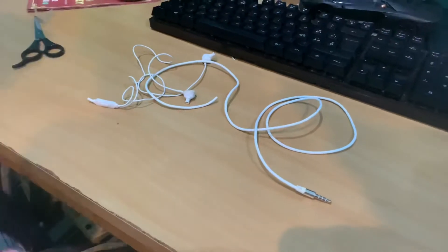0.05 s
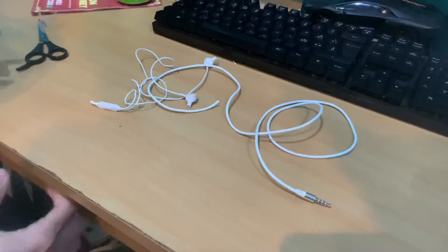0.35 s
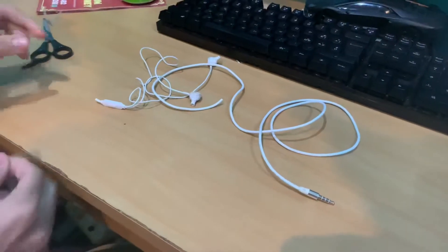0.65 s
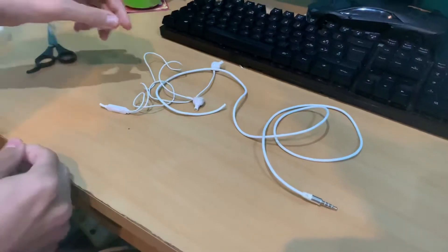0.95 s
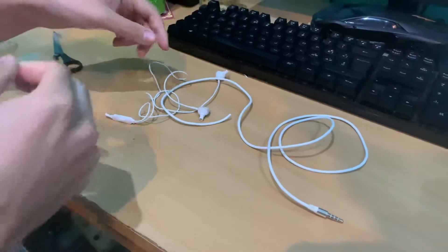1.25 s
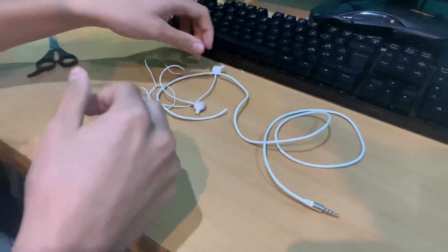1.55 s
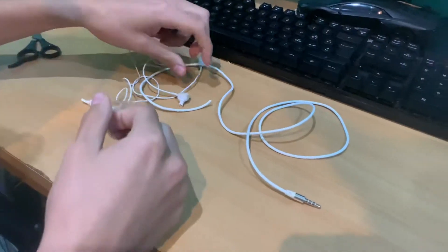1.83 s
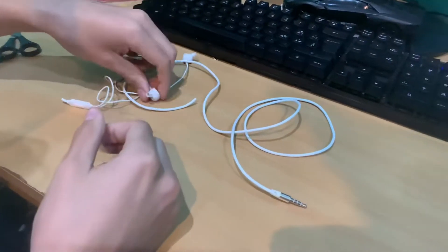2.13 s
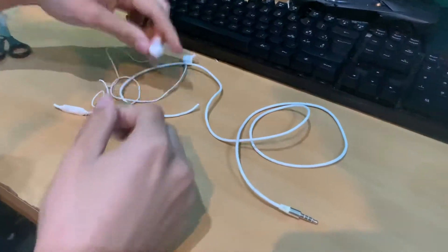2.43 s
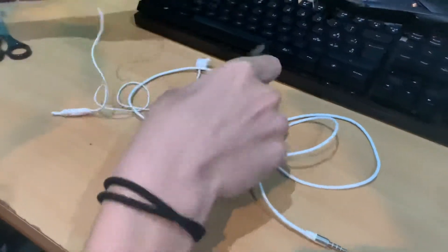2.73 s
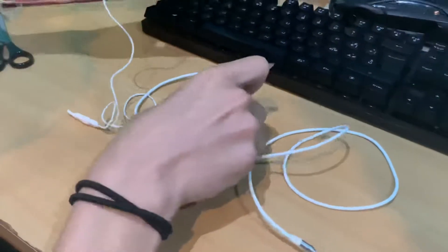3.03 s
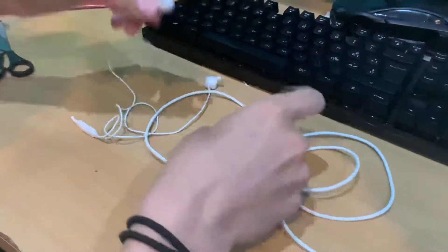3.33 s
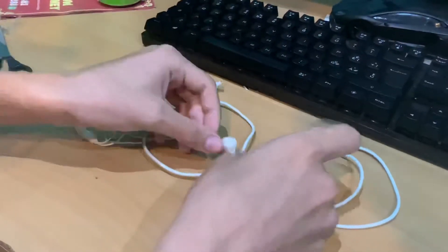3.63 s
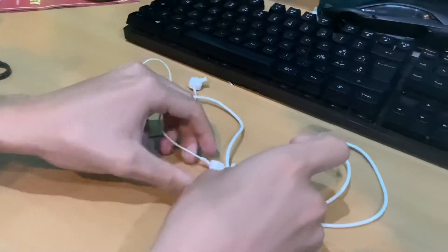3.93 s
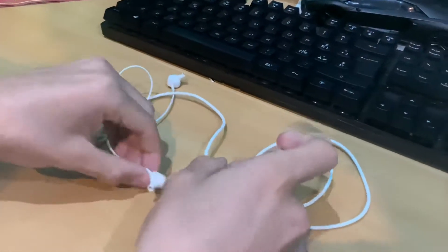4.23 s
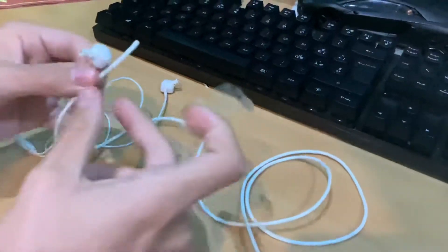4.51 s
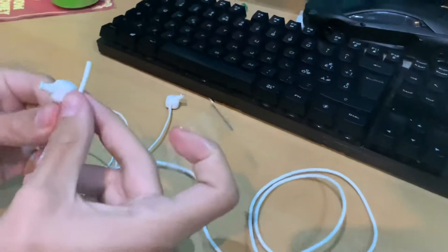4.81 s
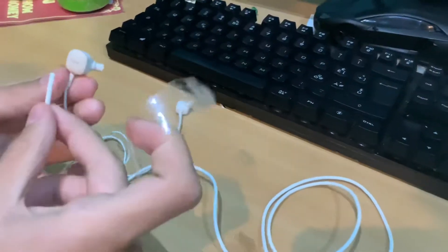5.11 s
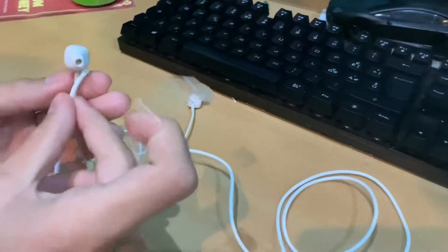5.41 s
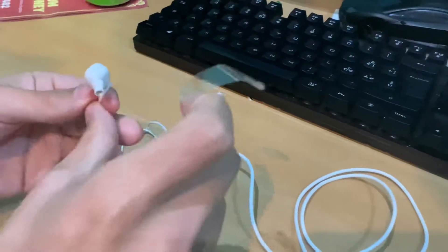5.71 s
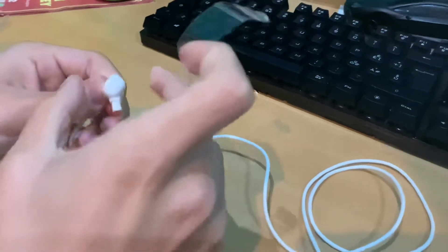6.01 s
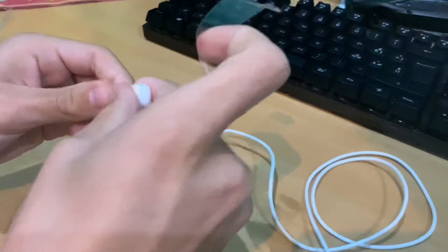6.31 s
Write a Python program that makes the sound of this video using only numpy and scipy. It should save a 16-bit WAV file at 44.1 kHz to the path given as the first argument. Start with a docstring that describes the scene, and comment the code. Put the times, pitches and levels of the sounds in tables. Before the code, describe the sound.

Wired earphones are handled on a wooden desk in a quiet room, close to the microphone. A soft brush of a hand leads into bright plastic clicks, then scattered light knocks with muffled handling bumps. The cable slides with a soft hiss, an earbud clacks down, and two firmer knocks follow. Only tiny touches remain at the end, over low room noise and a faint regular electrical tick.

```python
"""A soft brush of skin on wood, then sharp plastic clicks: hands sort out wired earphones on a desk.
Fingers, cable and earbuds knock, each impact exciting damped modes of the plastic or the desk top.
Skin, plastic and the rubber cable slide with the hiss and rasp of stick-slip friction.
Beneath lie soft thumps of handling, the noise of a quiet room and a faint regular electrical tick.
A small two-port microphone close by picks it all up."""
import sys
import numpy as np
from scipy import signal
from scipy.fft import rfft, irfft, next_fast_len
from scipy.io import wavfile

SR = 44100
rng = np.random.default_rng(int(sys.argv[2]) if len(sys.argv) > 2 else 0)


def store_wav(level_fs):
    """Save 16-bit WAV to argv[1]."""
    pcm = np.round(np.clip(np.atleast_2d(level_fs), -1, 1) * 32767)
    wavfile.write(sys.argv[1], SR, pcm.T.astype(np.int16))


N = 280476
TIME = np.arange(N) / SR

# reverberation time of the room: f/Hz, t60/s
ROOM_DECAY = [(200, 0.2), (530, 0.25), (1400, 0.32), (3700, 0.3), (10000, 0.16)]
# coherence of the two ports: f/Hz, coherence (0-1)
PORT_COHERENCE = [(300, 1), (750, .99), (1100, .8), (1500, .2), (2100, .35), (2500, .9), (2950, .9),
                  (3300, .7), (4800, .7), (5900, .25), (6600, .97), (7400, .97), (8400, .75), (9350, .995),
                  (10100, .995), (11200, .75), (12400, .98), (14000, .6)]
# phase by which the left port leads: f/Hz, phase/rad
PORT_LEAD = [(0, 0), (1100, 0), (1900, 3.1), (3000, 3.1), (4000, 1.8), (4800, 2.9), (5500, 2.9),
             (6400, 6.2), (7400, 6.4), (9350, 9.3), (10100, 9.6), (11900, 12.5), (12900, 12.7), (14500, 15)]

# spectral envelopes of the sources: f/Hz, level/dB
ROOM_SPECTRUM = [(20, -22.5), (50, 3), (130, -9.5), (250, -14), (420, -23), (540, -18), (700, -22.5),
                 (950, -25.5), (1150, -24), (1420, -15), (1560, -30), (2600, -32.5), (5000, -36.5),
                 (7000, -36), (12800, -37.5), (15000, -50.5)]
TICK_SPECTRUM = [(3000, -36), (5500, -12), (7000, 4.5), (8500, -10.5), (12500, -4.5), (15000, -12.5)]
SKIN_SPECTRUM = [(150, -2.5), (300, -4.5), (600, -1.5), (1100, 4), (2000, -5.5), (2800, -7), (4200, -17.5),
                 (5600, -19.5), (7200, -23.5), (9500, -25), (12500, -32.5), (15000, -40.5)]
CABLE_SPECTRUM = [(300, -23.5), (700, 2), (2000, 12), (2700, 11.5), (4100, 8.5), (5500, 4.5), (7500, -6.5),
                  (12000, 3.5), (15000, -46)]
DESK_SPECTRUM = [(120, -1.5), (200, -8.5), (380, -3.5), (550, -14), (950, 2), (1400, -7), (2000, -9),
                 (3000, -11), (3800, -19), (5500, -19), (8000, -22.5), (12000, -21.5), (13500, -33.5),
                 (15500, -36)]
EARBUD_SPECTRUM = [(150, -25), (470, -3.5), (750, -11.5), (1400, -4.5), (2000, -7), (2700, -3.5),
                   (3700, -10), (5000, -16.5), (7000, -33), (9500, -26), (12500, -30.5), (15500, -62)]
PLASTIC_SPECTRUM = [(150, -30.5), (500, -3.5), (750, -6.5), (1100, -3), (1600, -1), (2100, -5),
                    (2700, -22.5), (3600, -10.5), (5000, -6.5), (7000, -8), (9500, 2), (12000, -2.5),
                    (13600, -8), (14600, -21), (15500, -16)]
# further shaping of the plastic's spectrum when it is scraped: f/Hz, gain/dB
SCRAPE_SHAPING = [(150, -2), (2000, -3.5), (7000, 0), (12000, -2)]
# normal modes of each body: f/Hz, bandwidth/Hz, boost/dB
DESK_RESONANCES = [(186, 19, 9), (219, 16, 10), (307.4, 39, 6), (480.3, 39, 10), (544.3, 58, 7.5),
                   (720.3, 14, 6), (773, 18, 5.5), (927, 14, 1.5), (970, 37, 9.5), (1103.4, 53, 7.5),
                   (1376, 60, 6.5), (1599, 14, 6.5), (1716, 48, 9.5), (1890, 29, 11), (2040, 20, 7.5),
                   (2303, 14, 8)]
EARBUD_RESONANCES = [(455.5, 22, 8.3), (576, 25.4, 8.8), (737, 9.5, 16.8), (942, 35, 10), (1065, 61, 11),
                     (1280, 41.5, 8.3), (1550, 37, 6.4), (1750, 56, 8.3), (1983, 150, 8.2), (2205, 19, 12),
                     (3140, 40, 4.6), (3450, 16, 4.6), (3970, 59, 6.5), (4290, 26, 1.8)]
PLASTIC_RESONANCES = [(1000, 56, 6), (1109, 18, 7), (1611, 280, 8), (2060, 110, 13), (3400, 170, 4.1),
                      (3970, 81, 1.3), (5700, 200, 6), (6288, 62, 6.1), (6630, 56, 8), (7052, 69, 11),
                      (7600, 77, 5), (8264, 30, 6.6), (8800, 180, 5.1), (11200, 170, 5.4), (11750, 54, 2.3),
                      (12470, 55, 6)]

# troughs of the held microphone's rumble: t/s, level/dB
RUMBLE_FLOOR = [(0.0, -60), (0.92, -72.5), (1.74, -67.5), (3.83, -72.5), (4.02, -69.5), (6.36, -69.5)]
# bumps conducted through the microphone's case: t/s, final f/Hz, level/dB, swell time/s
CASE_BUMPS = [(0.223, 86.5, -49, 0.012), (.456, 76, -47.5, 0.0088), (1.014, 94, -41.5, 0.0098),
              (1.583, 84, -46, 0.0096), (1.624, 70, -46, 0.0082), (1.722, 66.5, -51, 0.014),
              (1.768, 106, -49, 0.011), (1.855, 113, -47, 0.0089), (1.906, 65.6, -44, 0.0069),
              (2.013, 92.6, -37.5, 0.0066), (2.168, 130, -53, 0.0069), (2.189, 54.3, -41.5, .013),
              (2.232, 80.4, -45, 0.01), (2.502, 70, -47.5, .014), (2.873, 61.6, -51.5, .014),
              (3.01, 65, -46.5, 0.0078), (4.457, 81.2, -39.5, 0.0035), (6.002, 57.7, -46.5, 0.011)]
# skin sliding on wood: t/s of the peak, duration/s, mid-band level/dB, brightness/dB
SKIN_STROKES = [(0.043, .11, -51, -2.5), (0.219, 0.13, -52, -2), (2.023, 0.094, -58, -8),
                (2.706, 0.12, -52.5, 4.5), (3.593, 0.22, -59.5, -1.5), (3.979, 0.14, -54, -2),
                (4.085, 0.089, -46, -3.5), (4.924, 0.072, -72.5, 2), (5.602, 0.069, -64.5, -2)]
# the cable is nudged, then drawn in two strokes: t/s, rasp level/dB, rasp f/Hz, hiss level/dB
CABLE_PULL = [(1.92, -80, 1800, -84), (1.965, -56, 1730, -86), (2.0, -49, 1670, -78),
              (2.07, -87.5, 1710, -96), (2.81, -86, 1270, -75), (2.86, -60.5, 1243, -64),
              (2.95, -60.5, 1220, -64.5), (3.04, -57, 1300, -66), (3.105, -65, 1296, -79),
              (3.131, -63.5, 1354, -58.5), (3.19, -57, 1220, -56), (3.24, -61, 1280, -56),
              (3.271, -51, 1080, -59), (3.309, -56, 884, -82), (3.381, -73, 850, -82)]
# plastic scraping between its clicks: t/s, duration/s, body level/dB, treble level/dB
PLASTIC_RUBS = [(.39, 0.026, -58, -66), (0.514, 0.14, -53, -48), (0.708, 0.19, -66.5, -58),
                (0.935, 0.041, -55.5, -49), (5.802, 0.022, -80, -70)]
# impacts on each body: t/s, contact time/s, body level/dB, treble level/dB
DESK_IMPACTS = [(.937, 0.0038, -50.5, -55), (1.002, 0.0037, -48, -48.5), (1.051, 0.0049, -49.5, -52),
                (1.102, 0.0043, -45, -53.5), (1.12, 0.0037, -61.5, -60), (1.573, 0.0045, -58, -56),
                (1.679, 0.0048, -50, -51.5), (1.817, 0.0056, -51, -54), (1.872, 0.0039, -49.5, -51.5),
                (2.008, 0.0047, -51.5, -52.5), (2.198, 0.0043, -68, -87.5), (2.582, 0.013, -44, -50),
                (2.635, 0.016, -51.5, -52.5), (2.727, 0.0021, -57, -51), (4.003, 0.0058, -41, -54.5),
                (4.063, 0.0041, -37.5, -49.5), (4.197, 0.0027, -58.5, -67), (4.217, .0029, -66, -52),
                (4.227, .0036, -58.5, -63.5), (5.581, 0.0057, -64, -65.5), (5.63, 0.0018, -74.5, -68)]
EARBUD_IMPACTS = [(3.6311, 0.0019, -33, -34), (3.643, 0.001, -43, -55), (3.655, 0.0018, -46.5, -61),
                  (3.812, 0.002, -57, -66), (4.004, 0.0034, -42, -46), (4.066, 0.0044, -50, -46.5),
                  (4.382, 0.002, -55.5, -70.5), (4.698, 0.0024, -65, -65), (4.921, .0008, -74, -83.5),
                  (4.954, 0.00055, -72, -78), (4.963, 0.00092, -68.5, -79)]
PLASTIC_IMPACTS = [(.392, 0.005, -59, -55), (.4445, 0.0024, -51.5, -46.5), (.482, 0.005, -45.5, -34.5),
                   (.4922, 0.00061, -46, -20), (.5028, 0.00098, -46.5, -30), (.524, 0.0017, -45, -44.5),
                   (.553, 0.0028, -47, -58), (.5655, 0.0028, -43.5, -35.5), (.6076, 0.00088, -42, -30.5),
                   (.648, 0.0024, -71, -46.5), (.6655, 0.0035, -67, -47), (.679, 0.002, -61, -43.5),
                   (.716, 0.003, -70, -45), (.7502, .0005, -80, -51.5), (.7638, 0.0025, -80, -49.5),
                   (.773, 0.0026, -76, -45), (.798, 0.00084, -56.5, -37.5), (.802, .002, -48.5, -45),
                   (.8105, .0008, -62, -47.5), (.856, 0.0019, -82, -51), (.8865, 0.00093, -82, -57.5),
                   (.902, 0.0011, -82, -45), (.9102, 0.0025, -76, -43), (.9593, 0.0018, -63, -50),
                   (.978, 0.015, -46, -41), (.992, 0.0032, -41.5, -38), (.9965, 0.00079, -42, -34),
                   (2.389, 0.0001, -82, -62.5), (3.353, 0.0017, -77, -70.5), (4.699, .0012, -82.5, -65.5)]
# single modes of plastic or desk top after firm contacts: t/s, f/Hz, level/dB, t60/s
RINGING_MODES = [(.4918, 1490, -22.5, 0.025), (.502, 1610, -27.5, 0.019), (.6092, 1030, -26, 0.016),
                 (.608, 590, -38, 0.011), (.994, 1437, -28.5, .029), (.993, 572, -39, 0.042),
                 (1.577, 967, -52, 0.076), (1.682, 973, -42, 0.084), (1.821, 960, -50.5, .06),
                 (1.872, 995, -42.5, 0.1), (2.008, 922, -44, 0.052), (2.181, 715, -43, 0.0041),
                 (2.582, 195, -43.5, 0.12), (2.584, 974, -42, 0.078), (3.6305, 1984, -22, 0.028),
                 (3.6338, 1640, -25.5, 0.026), (3.634, 1065, -37, 0.046), (3.6312, 3917, -42, 0.023),
                 (4.003, 563, -30, 0.026), (4.008, 186, -41.5, 0.27), (4.063, 720, -32.5, 0.02),
                 (4.062, 219, -41, 0.22), (4.084, 186, -54, .12)]


def from_db(db):
    """Amplitude ratio of a level in decibels."""
    return 10 ** (np.asarray(db) / 20)


def rms(x):
    """Root-mean-square amplitude."""
    return np.sqrt(np.mean(x ** 2) + 1e-24)


def at_hz(points, hz):
    """Interpolation on a logarithmic frequency axis."""
    f, value = np.transpose(points)
    return np.interp(np.log(np.maximum(hz, 1)), np.log(f), value)


def add(track, s, sound):
    """Superposition: a sound joins the track at time s."""
    start = max(round(s * SR), 0)
    part = sound[..., :max(N - start, 0)]
    track[..., start:start + part.shape[-1]] += part


def colour(x, spectrum, size=2048):
    """Minimum-phase filtering to a spectral envelope, rolling off below its first point."""
    hz = np.arange(size // 2 + 1) * SR / size
    gain = from_db(at_hz(spectrum, hz)) * np.clip(hz / spectrum[0][0], .1, 1) ** 2
    cepstrum = irfft(np.log(gain))
    cepstrum[1:size // 2] *= 2
    cepstrum[size // 2 + 1:] = 0
    response = irfft(np.exp(rfft(cepstrum)))
    return signal.fftconvolve(x, response[None], axes=1)[:, :x.shape[1]]


def split(x, edges_hz):
    """Crossover filtering into adjacent bands, lowest first."""
    bands = []
    for hz in edges_hz:
        bands.append(signal.sosfilt(signal.butter(3, hz, fs=SR, output="sos"), x))
        x = signal.sosfilt(signal.butter(3, hz, "high", fs=SR, output="sos"), x)
    return bands + [x]


def poles(hz, radius):
    """Filter denominator of a damped oscillator whose amplitude shrinks by radius each sample."""
    return [1, -2 * radius * np.cos(2 * np.pi * hz / SR), radius * radius]


def resonate(x, modes):
    """Resonance: each mode lifts a narrow band and rings on in it."""
    for hz, width_hz, boost_db in modes:
        radius = np.exp(-np.pi * width_hz / SR)
        ring = signal.lfilter([1, 0, -1], poles(hz, radius), x) * (1 - radius * radius) / 2
        x = x + (from_db(boost_db) - 1) * ring
    return x


def drift(per_s):
    """Random modulation: straight lines between standard normal values, per_s of them a second."""
    knots = rng.standard_normal(N)
    return np.interp(TIME * per_s, np.arange(N), knots)


def poisson_pulses(per_s):
    """Poisson process: unit pulses at independent random instants."""
    return rng.random(N) < per_s / SR


def pulse_sizes(spread_db, cap):
    """Exponential distribution of levels, limited to cap spreads: many small pulses, few large."""
    return from_db(spread_db * np.minimum(rng.exponential(1, N), cap))


def burst(t, decay_s, rise_s):
    """Exponential growth and decay of two noises, each of unit energy."""
    envelope = np.exp(-t / decay_s) * (1 - np.exp(-t / rise_s)) + 1e-12
    noise = rng.standard_normal((2, len(t))) * envelope
    return noise / np.sqrt(np.sum(noise ** 2, axis=1, keepdims=True))


def room_tail(t, build_s=.0054):
    """Reverberation: a diffuse field of about unit energy that dies soonest in the high treble."""
    centres, t60s = np.transpose(ROOM_DECAY)
    bands = split(rng.standard_normal((2, len(t))), np.sqrt(centres[1:] * centres[:-1]))
    tail = sum(band * from_db(-60 * t / t60) for band, t60 in zip(bands, t60s))
    tail *= 1 - np.exp(-t / build_s)
    return tail / np.sqrt(np.sum(tail ** 2) / 2)


def room_noise(hiss_gain_db=-64.5, lift_db=4.5, waver_db=1.5):
    """Broadband noise: a steady hiss over a low rumble that wavers as the microphone is held."""
    noise = colour(rng.standard_normal((2, N)), ROOM_SPECTRUM, size=8192)
    rumble, hiss = split(noise / rms(noise), [160])
    rumble_db = np.interp(TIME, *np.transpose(RUMBLE_FLOOR)) + lift_db + waver_db * drift(per_s=5.4)
    return from_db(rumble_db) * rumble / rms(rumble) + from_db(hiss_gain_db) * hiss


def electrical_tick(first_s=.0644, period_s=.1024, drive_db=-41, spread_db=1):
    """A periodic pulse train, filtered to a faint thin tick."""
    times = np.arange(first_s, N / SR, period_s)
    heights = from_db(drive_db + spread_db * rng.standard_normal(len(times)))
    pulses = np.zeros((2, N))
    pulses[0, (times * SR).astype(int)] = heights
    return colour(pulses, TICK_SPECTRUM)


def handling_thumps(start_ratio=2.1, sag_s=.0043, rumble_share=.25, rumble_decay_s=.02):
    """Structure-borne sound: a bump lasts a few slow cycles and leaves a rumble; each one is heard starting
    higher and quickly sinking in pitch."""
    out, t = np.zeros((2, N)), np.arange(SR // 3) / SR
    rumble_band = signal.butter(3, [45, 190], "band", fs=SR, output="sos")
    for s, hz, db, swell_s in CASE_BUMPS:
        pitch = hz * (1 + (start_ratio - 1) * np.exp(-t / sag_s))
        push = t / swell_s * np.exp(1 - t / swell_s) * np.sin(2 * np.pi * np.cumsum(pitch) / SR)
        noise = signal.sosfilt(rumble_band, rng.standard_normal(len(t)))
        rumble = rumble_share * noise / rms(noise) * np.exp(-t / rumble_decay_s)
        add(out[0], s, from_db(db) * (push + rumble))
    return out


def skin_slides(catch_db=-3, rise_share=.3, bass_db=-6, treble_db=-5.5, thinning=1.23, uneven_db=2):
    """Sliding friction: a hiss with tiny catches drives the desk's modes, swelling with each stroke."""
    catches = poisson_pulses(per_s=400) * rng.standard_normal((2, N))
    grain = rng.standard_normal((2, N)) + from_db(catch_db) * catches / rms(catches)
    bands = split(resonate(colour(grain, SKIN_SPECTRUM), DESK_RESONANCES), [600, 2500])
    envelopes = np.zeros((3, N))
    for s, length_s, level_db, bright_db in SKIN_STROKES:
        rise_s, fall_s = rise_share * length_s, (1 - rise_share) * length_s
        t = TIME - s
        stroke = np.exp(-np.where(t < 0, (t / rise_s) ** 2, np.abs(t / fall_s) ** 2.4))
        # a light touch is thin: it loses bass as it gains brightness
        tilt_db = np.array([bass_db - thinning * bright_db, 0, treble_db + bright_db])
        envelopes += from_db(level_db + tilt_db)[:, None] * stroke
    sound = sum(envelope * band / rms(band) for envelope, band in zip(envelopes, bands))
    return sound * from_db(uneven_db * drift(per_s=90))


def cable_drag(rasp_width_hz=480, uneven_db=1.5, block=128):
    """Stick-slip of rubber: dense pulses hiss and ring a broad resonance that moves with the pull."""
    sizes = pulse_sizes(spread_db=1.2, cap=4) * rng.standard_normal((2, N))
    slips = resonate(poisson_pulses(per_s=4000) * sizes, DESK_RESONANCES)
    times, *columns = np.transpose(CABLE_PULL)
    rasp_db, rasp_hz, hiss_db = [np.interp(TIME, times, column) for column in columns]
    rasp, state = np.zeros((2, N)), np.zeros((2, 2))
    radius = np.exp(-np.pi * rasp_width_hz / SR)
    for i in range(0, N, block):
        span = np.s_[:, i:i + block]
        rasp[span], state = signal.lfilter([1, 0, -1], poles(rasp_hz[i], radius), slips[span], zi=state)
    hiss = colour(slips, CABLE_SPECTRUM)
    sound = from_db(rasp_db) * rasp / rms(rasp) + from_db(hiss_db) * hiss / rms(hiss)
    pulling = (TIME > times[0]) & (TIME < times[-1])
    return sound * from_db(-uneven_db * drift(per_s=70)) * pulling


def crinkle(t60_cycles=95, pitches=14):
    """Impulse responses: each tiny snap rings briefly in one of several high resonators."""
    sizes = pulse_sizes(spread_db=4.5, cap=3) * rng.choice([-1, 1], N)
    snaps = poisson_pulses(per_s=220) * sizes
    resonator = rng.integers(0, pitches, N)
    out = np.zeros(N)
    for k, hz in enumerate(np.geomspace(6000, 13000, pitches)):
        radius = from_db(-60 * hz / t60_cycles / SR)
        out += signal.lfilter([1, 0, -1], poles(hz, radius), snaps * (resonator == k) + 1e-18)
    return out / rms(out) * np.array([[1], [.5]])


def plastic_scrape(crinkle_db=-2, fade_s=.011, uneven_db=1):
    """Stick-slip of hard plastic: slips, sparser and less even than rubber's, excite its modes."""
    sizes = pulse_sizes(spread_db=3.2, cap=4) * rng.choice([-1, 1], (2, N))
    slips = poisson_pulses(per_s=800) * sizes
    slips[1] *= .6   # the unshared part is weaker
    rubbing = colour(colour(slips, PLASTIC_SPECTRUM), SCRAPE_SHAPING)
    body, treble = split(resonate(rubbing, PLASTIC_RESONANCES), [2700])
    treble = treble / rms(treble) + from_db(crinkle_db) * crinkle()
    envelopes = np.zeros((2, N))
    for s, length_s, body_db, treble_db in PLASTIC_RUBS:
        before, after = np.maximum(s - TIME, 0), np.maximum(TIME - s - length_s, 0)
        envelopes += from_db([[body_db], [treble_db]]) * np.exp(-(before + after) / fade_s)
    sound = envelopes[0] * body / rms(body) + envelopes[1] * treble / rms(treble)
    return sound * from_db(uneven_db * drift(per_s=100))


def impacts(rows, spectrum, modes, *, softness, mode_spread_db, bass_db, bass_edge_hz, thinning,
            near_db, near_s, room_db, tail_ring, reference_contact_s, echo_per_doubling_db,
            unshared_db=-6.5, snap_height=2.2, snap_contact_s=.0006, bass_lag_s=.0018):
    """Impact excitation: direct sound, near reflections and room tail; long contacts echo more."""
    out, t = np.zeros((2, N)), np.arange(SR * 3 // 10) / SR
    attack = round(.012 * SR)   # band levels hold over these first samples
    room = room_tail(t)
    for s, contact_s, body_db, treble_db in rows:
        rise_s = softness * contact_s
        echo_db = echo_per_doubling_db * np.log2(contact_s / reference_contact_s)
        tail = from_db(echo_db + room_db) * room
        reflections = from_db(echo_db + near_db) * burst(t, near_s, rise_s)
        direct = from_db([[0], [unshared_db]]) * burst(t, contact_s, rise_s)   # contact chatter
        direct[0, 0] += snap_height * np.exp(-contact_s / snap_contact_s)   # brief contacts snap cleanly
        struck_modes = [(hz, width_hz, boost_db + mode_spread_db * rng.standard_normal())
                        for hz, width_hz, boost_db in modes]
        # only the share tail_ring of the tail carries the modes
        sound = resonate(direct + reflections + tail_ring * tail, struck_modes) + (1 - tail_ring) * tail
        bands = split(colour(sound, spectrum), [bass_edge_hz, 2500])
        low_db = body_db + bass_db - thinning * (treble_db - body_db)   # brighter blows have less bass
        for band, db, lag_s in zip(bands, [low_db, body_db, treble_db], [bass_lag_s, 0, 0]):
            add(out, s + lag_s, band * from_db(db) / rms(band[:, :attack]))
    return out


def desk_knocks():
    """Modal response of wood: fingers, cable and plug strike the desk top and the room answers."""
    return impacts(DESK_IMPACTS, DESK_SPECTRUM, DESK_RESONANCES, softness=.55, mode_spread_db=2.5,
                   bass_db=-5.5, bass_edge_hz=740, thinning=.41,
                   near_db=-2.5, near_s=.028, room_db=6.5, tail_ring=1,
                   reference_contact_s=.0054, echo_per_doubling_db=10.5)


def earbud_taps():
    """Modal response of a small body: an earbud touches the desk or the fingers."""
    return impacts(EARBUD_IMPACTS, EARBUD_SPECTRUM, EARBUD_RESONANCES, softness=.88, mode_spread_db=2.6,
                   bass_db=-12, bass_edge_hz=500, thinning=.15,
                   near_db=-2, near_s=.009, room_db=-1.5, tail_ring=.8,
                   reference_contact_s=.0014, echo_per_doubling_db=6.5)


def contact_rings(swell_cycles=2.7, unshared_db=-2.5, room_db=-10):
    """Damped free vibration: after a firm contact a mode swells, decays and lingers in the room."""
    out, t = np.zeros((2, N)), np.arange(SR * 3 // 10) / SR
    for s, hz, db, t60 in RINGING_MODES:
        swell_s = swell_cycles / hz
        envelope = from_db(db - 60 * np.maximum(t - swell_s, 0) / t60) * np.minimum(t / swell_s, 1)
        add(out[0], s, envelope * np.sin(2 * np.pi * hz * t))
        add(out[1], s, envelope * from_db(unshared_db) * np.cos(2 * np.pi * hz * t))
    reverberation = signal.fftconvolve(out[:1], room_tail(t), axes=1)[:, :N]
    return out + from_db(room_db) * reverberation


def plastic_clicks():
    """Hard contact: an abrupt force has a wide spectrum, so the plastic clicks thin and bright."""
    return impacts(PLASTIC_IMPACTS, PLASTIC_SPECTRUM, PLASTIC_RESONANCES, softness=.2, mode_spread_db=0,
                   bass_db=-13, bass_edge_hz=660, thinning=.077,
                   near_db=-1.5, near_s=.0087, room_db=-7, tail_ring=.9,
                   reference_contact_s=.003, echo_per_doubling_db=1)


def microphone_ports(field):
    """Partial coherence: the field's shared and unshared rows become left and right, offset in phase."""
    size = next_fast_len(N + SR // 10)
    shared, unshared = rfft(field, size)
    hz = np.arange(len(shared)) * SR / size
    coherence = np.clip(at_hz(PORT_COHERENCE, hz), 0, 1)
    mid = np.sqrt((1 + coherence) / 2) * shared
    side = np.sqrt((1 - coherence) / 2) * unshared
    lag = np.exp(-1j * np.interp(hz, *np.transpose(PORT_LEAD)))
    lean_right = from_db(at_hz([(400, 0), (1200, .74), (10000, .35)], hz))
    left, right = (mid + side) / lean_right, (mid - side) * lag * lean_right
    return irfft(np.array([left, right]), size)[:, :N]


def scene():
    """Superposition of all sources: row 0 of each is shared by the ports, row 1 is unshared."""
    contacts = plastic_clicks() + desk_knocks() + earbud_taps()
    friction = plastic_scrape() + skin_slides() + cable_drag()
    background = room_noise() + electrical_tick()
    return microphone_ports(background + friction + contacts + contact_rings() + handling_thumps())


def record(dry):
    """Soft saturation rounds the hardest snap; a steep low-pass filter limits the bandwidth."""
    ceiling, cutoff_hz = .85, 16200
    rounded = ceiling * np.tanh(dry / ceiling)
    return signal.sosfilt(signal.ellip(10, .1, 80, cutoff_hz, fs=SR, output="sos"), rounded)


dry = scene()
out = record(dry)
store_wav(out)
```